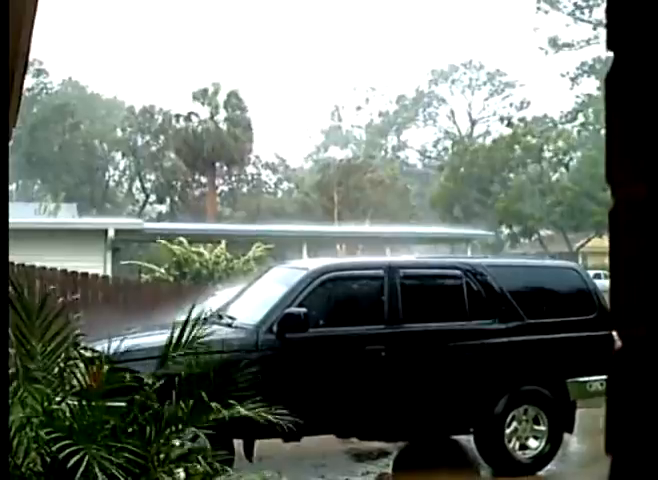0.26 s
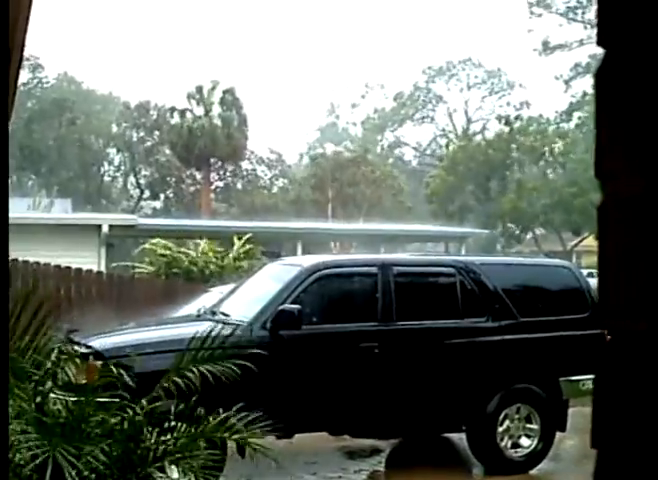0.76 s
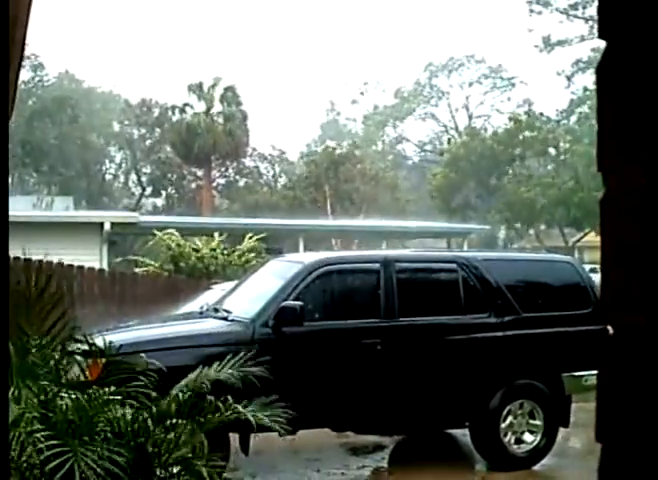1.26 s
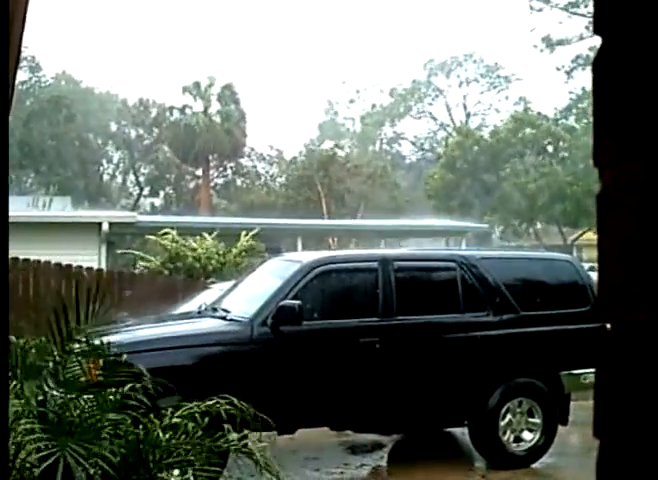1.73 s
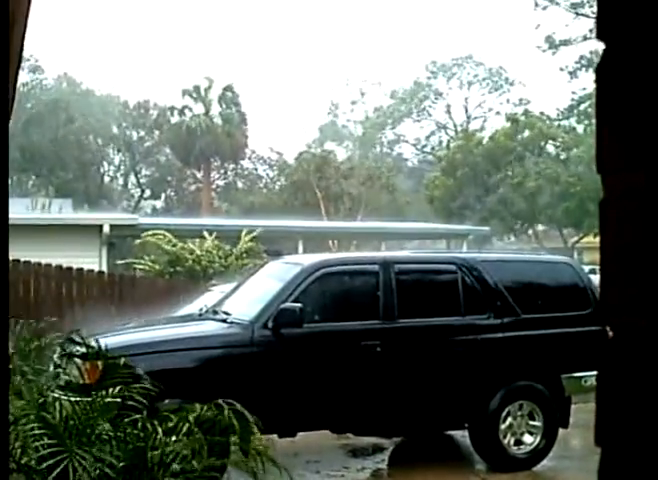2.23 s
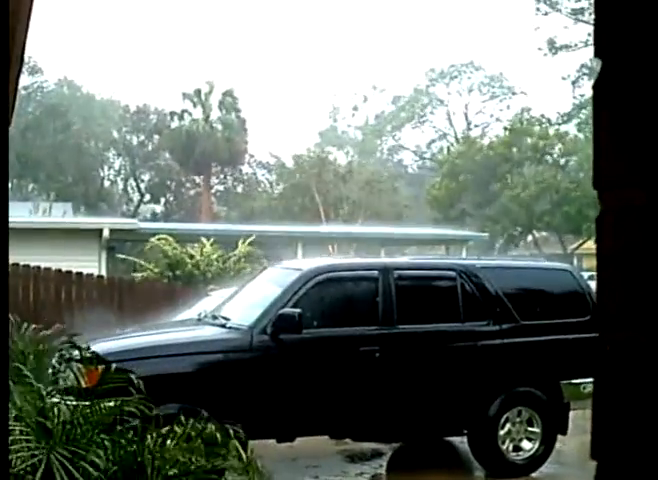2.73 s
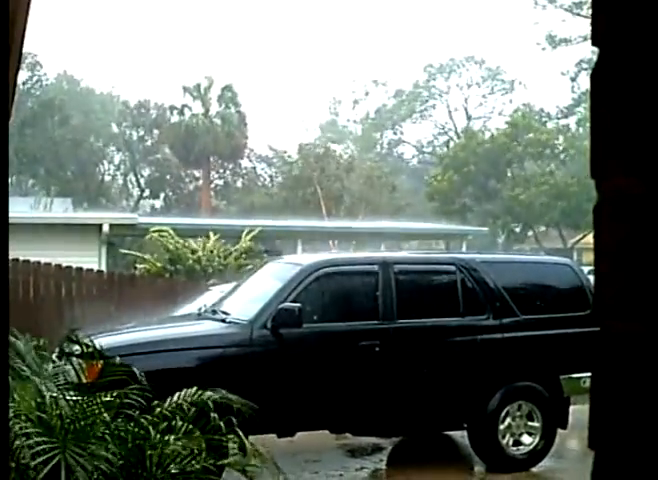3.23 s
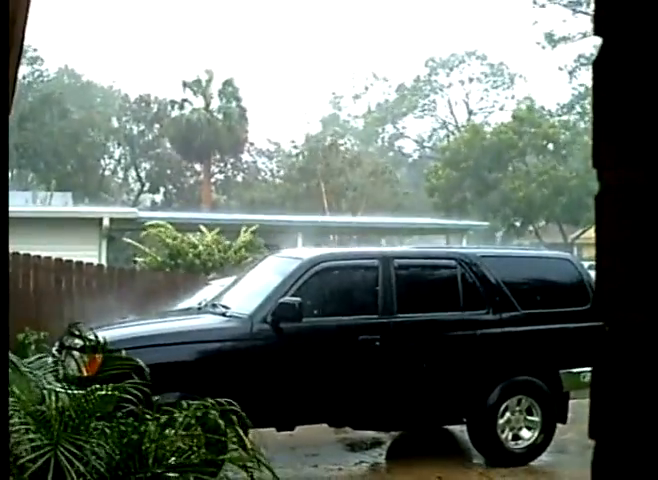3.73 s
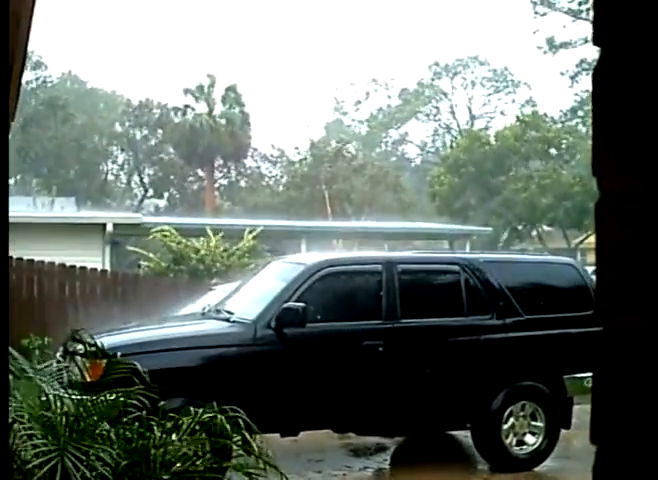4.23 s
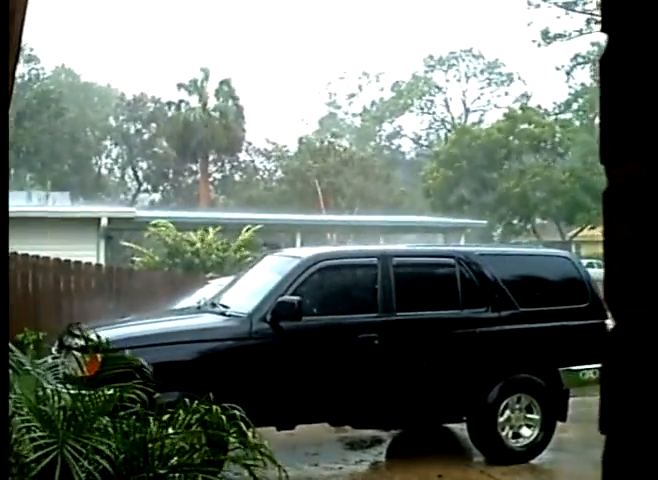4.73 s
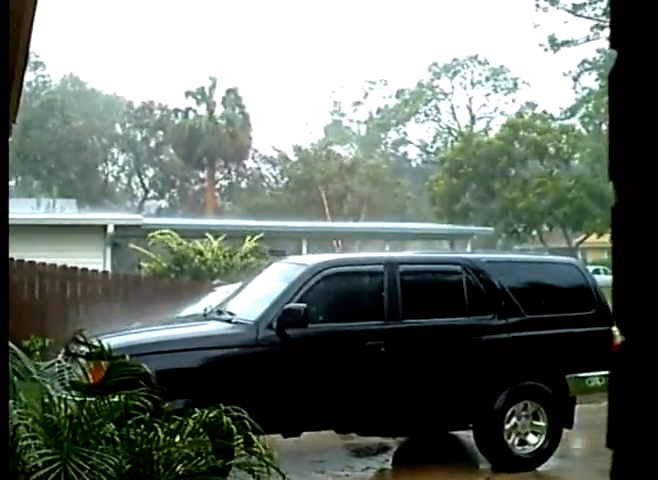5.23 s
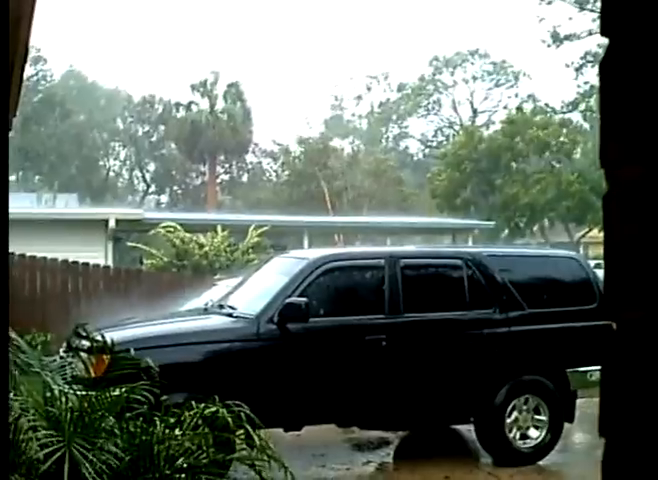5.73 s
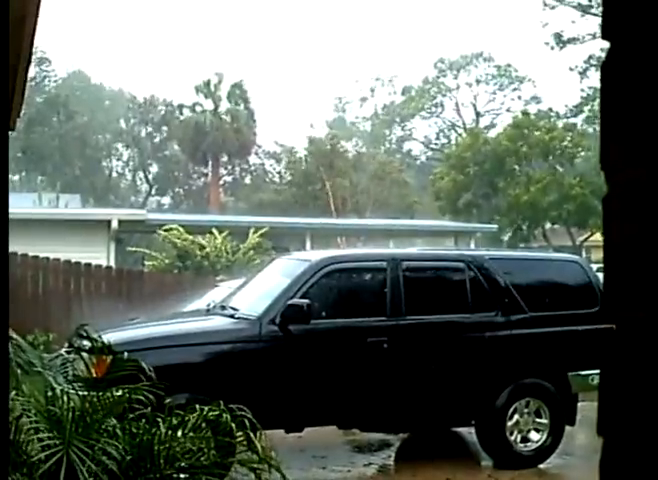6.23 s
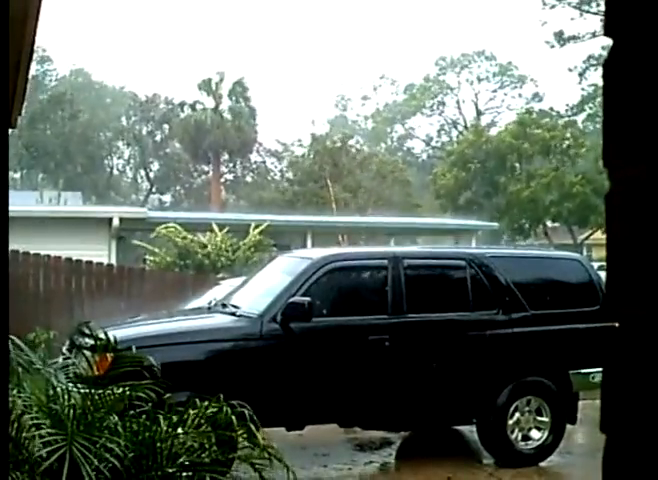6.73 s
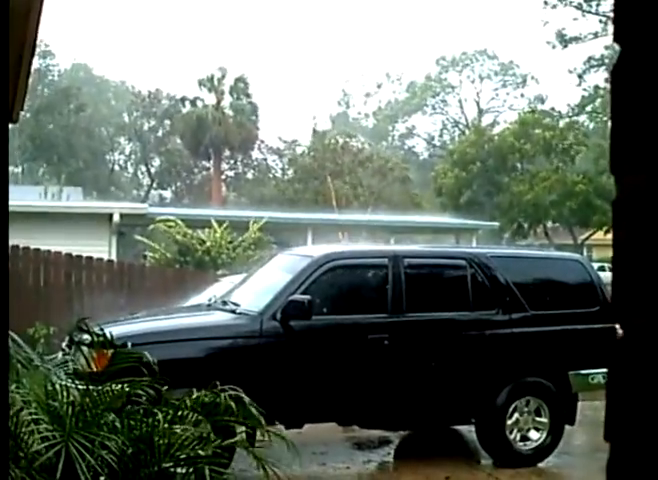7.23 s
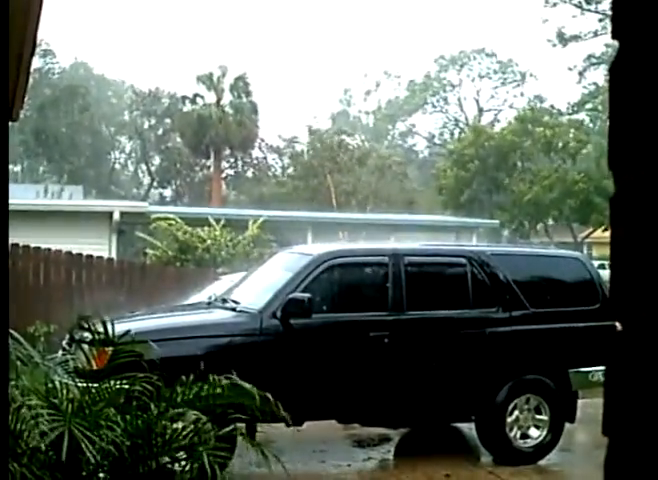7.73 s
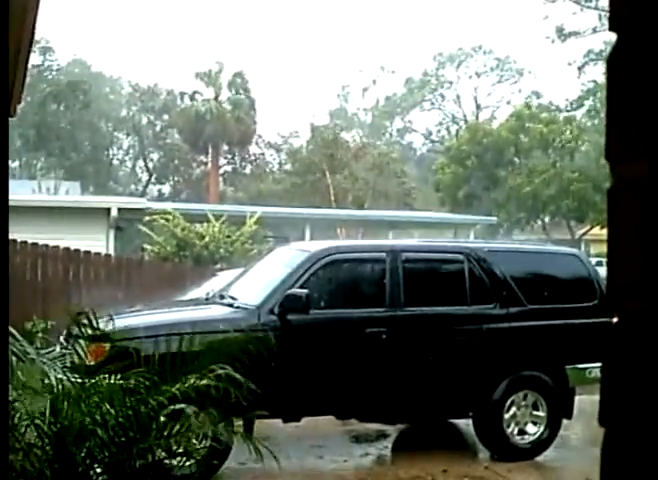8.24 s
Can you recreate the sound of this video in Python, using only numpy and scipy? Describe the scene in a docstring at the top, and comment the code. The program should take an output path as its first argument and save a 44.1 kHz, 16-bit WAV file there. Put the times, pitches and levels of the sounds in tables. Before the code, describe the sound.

Heavy rain falls continuously from start to finish, heard from a sheltered spot under the eaves facing a driveway and parked car. A wide, grey, distant wash lies behind hollow low-to-mid drumming on roof and car, with fine ticking on leaves and wet concrete nearer. At about 0.9 seconds a soft, low double-edged thump knocks the handheld camera, with a faint nudge at 1.1. Close drops smack crisply near 1.1, 2.4 and 3.3 seconds, the latter two clearest, and very faintly at 4.6. Drumming thickens around 1.75; a brighter splashing sheet passes near 5.2, another around 7.6. Overall the rain eases gradually until about 6 seconds, then stays steady. A weak breeze rumbles beneath, puffing near 1.1, 3.5 and 8.1, where another barely audible nudge occurs. Drumming swells slightly at the end. The small microphone dulls everything above roughly 5 kHz.

```python
"""Downpour from under the eaves

Heavy rain on a driveway, a parked car and a yard, heard from under the eaves of a house.
Far off, countless drops merge into a wash of shaped noise; nearer, short ticks patter on leaves and wet
concrete; heavy drops drum on roof and car as ringing resonances, and a few smack beside the microphone.
A breeze rumbles on the hand-held camera, which takes a soft thump and two faint nudges.
The rain eases, then holds steady under passing sheets; the microphone passes little above 5 kHz."""
import sys
import numpy as np
from scipy import signal
from scipy.fft import rfft, irfft, next_fast_len
from scipy.io import wavfile
from scipy.ndimage import uniform_filter1d

SR = 44100
rng = np.random.default_rng(int(sys.argv[2]) if len(sys.argv) > 2 else 0)


def output_pcm(signal):
    """Save a mono or channel-first signal as 16-bit PCM at the path in sys.argv[1].

    Samples are clipped to [-1, 1] before scaling.
    """
    pcm = np.clip(np.atleast_2d(signal).T, -1, 1) * 32767
    wavfile.write(sys.argv[1], SR, np.round(pcm).astype(np.int16))


N = 373527  # length in samples
TIME = np.arange(N) / SR  # seconds

# far wash, relative spectrum: freq_hz, density_db (per Hz)
WASH_SPECTRUM = [(60, -5.5), (130, 0), (170, -1), (300, -0.5), (480, 0), (750, 1.5), (900, 0), (1100, 0.4),
                 (1300, -1.5), (1600, -1.44), (2200, -3), (3200, -6.5), (4600, -9.5), (7000, -16)]
# filter on the near ticks: freq_hz, gain_db
SPLASH_FILTER = [(500, -21.5), (1500, -10.5), (2500, -3), (3500, -0.5), (4600, -0.5), (7000, 3)]
# breeze rumble, relative spectrum: freq_hz, density_db (per Hz)
WIND_SPECTRUM = [(10, -13.5), (22, -4), (40, -1), (65, -0.5), (120, -12.5), (300, -32), (1000, -61.5)]
# resonances of roof and car under the drops: pitch_hz, width_hz (of each of two passes), gain_db
PANEL_MODES = [(94.6, 22, 3), (217.7, 21.8, 0), (295.5, 33.6, 1.5), (335.6, 53, 0.5), (410.4, 71, -1),
               (538.6, 71, -2), (643, 96, -2.5), (713, 70, -0.5), (777, 70, -3), (1066, 220, -6.5)]
# brief swells of the drumming around one pitch: centre_s, level_db, pitch_hz, half_s (fall to 1/e)
DRUM_SWELLS = [(0.23, -31, 1140, .014), (0.842, -31.5, 302, 0.013), (2.506, -36, 1046, 0.019),
               (2.94, -35, 387, 0.093), (2.959, -35, 1090, .016), (5.908, -35, 617, .012),
               (6.931, -33.5, 317, 0.016), (7.09, -34, 330, 0.027), (7.572, -32.5, 400, 0.013)]
# drops right beside the microphone: start_s, level_db, pitch_hz
CLOSE_SMACKS = [(1.130, -22, 3900), (2.3759, -14, 4200), (3.334, -15.5, 4450), (4.572, -26, 4300)]
# low damped tones on the camera, the first three overlap as one thump, then two nudges:
# start_s, peak_db, pitch_hz, t60_s
CAMERA_TONES = [(0.8842, -14, 105.6, 0.035), (0.9013, -12.5, 140, 0.036), (0.909, -15, 50.3, 0.057),
                (1.083, -18.5, 34.8, 0.06), (8.11, -29.5, 38, 0.12)]
# gusts drive in denser rain: centre_s, half_s (fall to 1/e), wash_rise_db, drumming_rise_db, splash_rise_db
RAIN_SHEETS = [(.95, .3, 0.8, 0, 1.2), (1.75, 0.32, 1, 3, 0), (3.95, 0.21, 1, 0.3, 0.5),
               (5.156, 0.49, 1.6, 0.7, 4.5), (7.6, .4, 1.4, 0, 2.5), (8.3, 0.27, .4, 3.0, 0.7)]
# puffs of wind on the microphone: centre_s, half_s (fall to 1/e), rise_db
WIND_PUFFS = [(.2, .22, 2.5), (1.1, 0.27, 5), (3.55, .33, 6), (8.1, .1, 6.5)]
# microphone response: freq_hz, gain_db
MIC_RESPONSE = [(20, 0.5), (4400, 0), (5100, -4.5), (5500, -13.5), (5900, -17), (6500, -26), (7200, -36),
                (8000, -46.5), (8800, -61.5)]

# base levels before any easing: far wash, drumming panels, near splashes, breeze
WASH_DB, DRUM_DB, SPLASH_DB, BREEZE_DB = -29, -34, -36.5, -43.5
# the wash eases at an even pace, then holds steady
EASE_DB_PER_S, STEADY_FROM_S = 0.75, 6.05
# how far the others ease, as a ratio to the wash
DRUM_FOLLOW, SPLASH_FOLLOW, BREEZE_FOLLOW = 0.71, 0.52, 1.05


def undb(db):
    """Decibels to gain."""
    return 10 ** (np.asarray(db) / 20)


def unit(x):
    """Scale to rms 1."""
    return x / np.sqrt(np.mean(x ** 2))


def colour(x, spectrum):
    """Filter by (Hz, dB) points joined on a log-frequency axis."""
    size = next_fast_len(N + 4096)
    hz, db = np.transpose(spectrum)
    bins = np.maximum(np.fft.rfftfreq(size, 1 / SR), 1)
    gain = undb(np.interp(np.log(bins), np.log(hz), db))
    return irfft(rfft(x, size) * gain, size)[:N]


def resonate(x, hz, width_hz):
    """One resonance, gain 1 at its centre."""
    b, a = signal.iirpeak(hz, hz / width_hz, fs=SR)
    return signal.lfilter(b, a, x)


def ring(x, hz, width_hz):
    """A resonance applied twice: steep skirts and dark valleys."""
    return resonate(resonate(x, hz, width_hz), hz, width_hz)


def walk(rate_hz):
    """Random levels held for 1 / rate_hz seconds and smoothed twice; rms 1."""
    hold = int(SR / rate_hz)
    held = np.repeat(rng.standard_normal(N // hold + 1), hold)[:N]
    return unit(uniform_filter1d(uniform_filter1d(held, hold), hold))


def surge(centre_s, half_s):
    """A smooth rise and fall around one moment, 1 at its top."""
    return np.exp(-((TIME - centre_s) / half_s) ** 2)


def drops(per_s, spread_db):
    """Impacts of either sign at random moments, many small and a few large."""
    falls = rng.random(N) < per_s / SR
    strength = undb(spread_db * rng.standard_normal(N))
    return falls * rng.choice([-1, 1], N) * strength


def easing():
    """How many dB the wash has lost since the start."""
    return EASE_DB_PER_S * np.minimum(TIME, STEADY_FROM_S)


def downpour():
    """Levels of wash, drumming and splashes in dB: they ease together and swell with the sheets of rain."""
    wash_db = WASH_DB - easing()
    drum_db = DRUM_DB - DRUM_FOLLOW * easing()
    splash_db = SPLASH_DB - SPLASH_FOLLOW * easing()
    for centre_s, half_s, wash_rise_db, drum_rise_db, splash_rise_db in RAIN_SHEETS:
        sheet = surge(centre_s, half_s)
        wash_db = wash_db + wash_rise_db * sheet
        drum_db = drum_db + drum_rise_db * sheet
        splash_db = splash_db + splash_rise_db * sheet
    return wash_db, drum_db, splash_db


def wash():
    """Rain on far trees and roofs: too many drops to tell apart, so noise that sways a little."""
    far_rain = unit(colour(rng.standard_normal(N), WASH_SPECTRUM))
    return far_rain * undb(0.61 * walk(6))


def drumming():
    """Heavy drops set each panel ringing; every panel catches its own drops."""
    panels = np.zeros(N)
    for hz, width_hz, gain_db in PANEL_MODES:
        sway = undb(gain_db + 0.8 * walk(7.6))
        panels += sway * ring(drops(per_s=800, spread_db=3.0), hz, width_hz)
    return unit(panels)


def patter(count=8):
    """Near drops on leaves and wet concrete: ticks of a few cycles, spread over a set of pitches."""
    ticks = np.zeros(N)
    for hz in np.geomspace(1500, 6000, count):
        tick = unit(resonate(drops(per_s=900, spread_db=4.5), hz, hz / 3))
        ticks += tick * np.sqrt(hz) * undb(0.6 * walk(9.9))
    # the drops come in loose bunches
    return unit(colour(ticks, SPLASH_FILTER)) * undb(0.65 * walk(22))


def drum_swells():
    """A short burst of dense drops rings at one pitch."""
    out = np.zeros(N)
    for centre_s, level_db, hz, half_s in DRUM_SWELLS:
        ringing = unit(ring(drops(per_s=990, spread_db=4.0), hz, 100))
        out += undb(level_db) * ringing * surge(centre_s, half_s)
    return out


def smacks(ping_s=0.00055, crack_s=0.0022, crack_db=-6.5, spray_s=0.014, spray_db=-15):
    """A close drop: a bright crack and a tiny ping, with a short fizz of spray dying away after."""
    out, t = np.zeros(N), TIME[:SR // 10]
    treble = signal.butter(3, 3200, "highpass", fs=SR, output="sos")
    for start_s, level_db, hz in CLOSE_SMACKS:
        hiss = unit(signal.sosfilt(treble, rng.standard_normal(len(t))))
        ping = np.sin(2 * np.pi * hz * t) * np.exp(-t / ping_s)
        crack = undb(crack_db) * np.exp(-t / crack_s)
        spray = undb(spray_db) * np.exp(-t / spray_s)
        start = int(start_s * SR)
        out[start:start + len(t)] += undb(level_db) * (ping + hiss * (crack + spray))
    return out


def thump_and_nudges():
    """Soft contacts shake the camera: low damped tones swell within a few ms and quickly die."""
    out = np.zeros(N)
    for start_s, peak_db, hz, t60_s in CAMERA_TONES:
        t = np.maximum(TIME - start_s, 0)
        swell = (1 - np.exp(-t / 0.0013)) * np.exp(-np.log(1000) * t / t60_s)
        out += undb(peak_db) * swell / swell.max() * np.sin(2 * np.pi * hz * t)
    return out


def breeze():
    """Eddies at the microphone port make an uneven low rumble."""
    rumble = unit(colour(rng.standard_normal(N), WIND_SPECTRUM))
    return rumble * undb(1.0 * walk(6.6))


def breeze_level():
    """Breeze level in dB: it dies down with the rain and rises in puffs."""
    level_db = BREEZE_DB - BREEZE_FOLLOW * easing()
    for centre_s, half_s, rise_db in WIND_PUFFS:
        level_db = level_db + rise_db * surge(centre_s, half_s)
    return level_db


def scene():
    """Three depths of rain follow the downpour; breeze and contacts act on the camera itself."""
    wash_db, drum_db, splash_db = downpour()
    rain = undb(wash_db) * wash() + undb(drum_db) * drumming() + undb(splash_db) * patter()
    accents = drum_swells() + smacks()
    on_camera = thump_and_nudges() + undb(breeze_level()) * breeze()
    return (rain + accents + on_camera)[None]


def record(dry):
    """A narrow-band camera microphone: its response, then a steep cut above 8.6 kHz."""
    heard = colour(dry[0], MIC_RESPONSE)
    steep_cut = signal.ellip(8, 0.2, 70, 8600, fs=SR, output="sos")
    return signal.sosfilt(steep_cut, heard)[None]


dry = scene()
out = record(dry)
output_pcm(out)
```